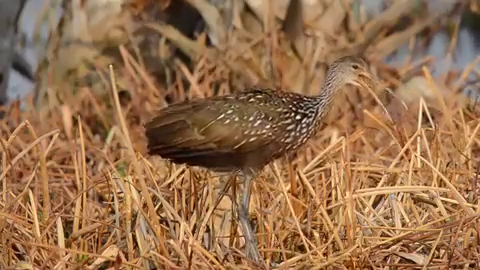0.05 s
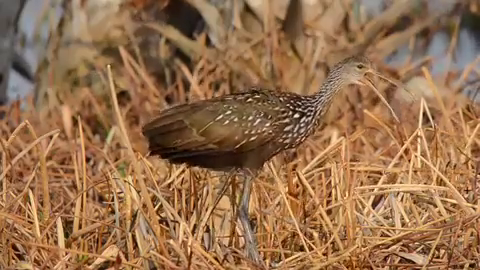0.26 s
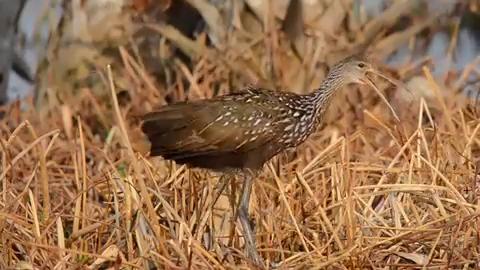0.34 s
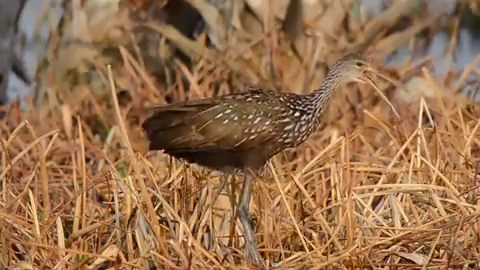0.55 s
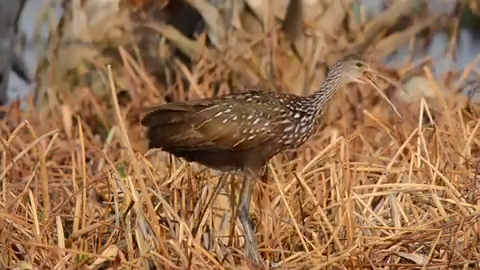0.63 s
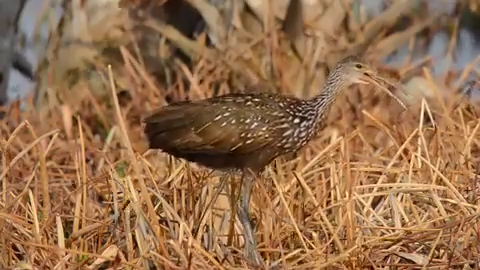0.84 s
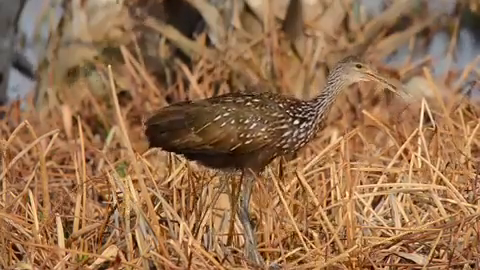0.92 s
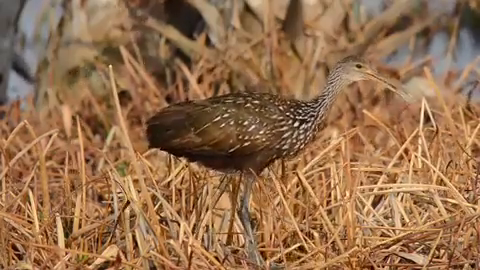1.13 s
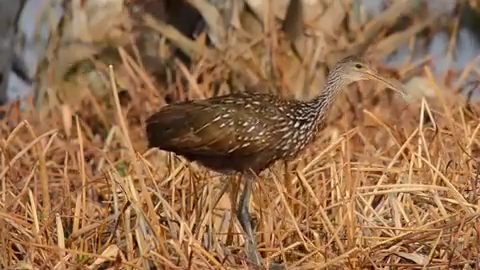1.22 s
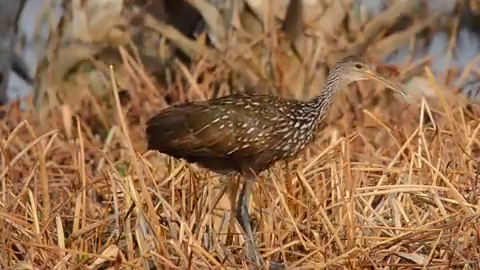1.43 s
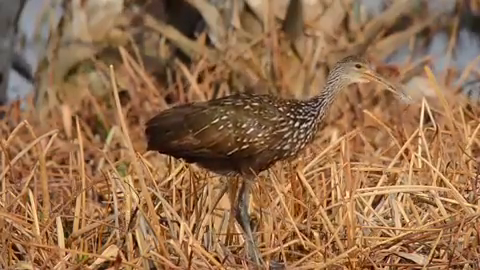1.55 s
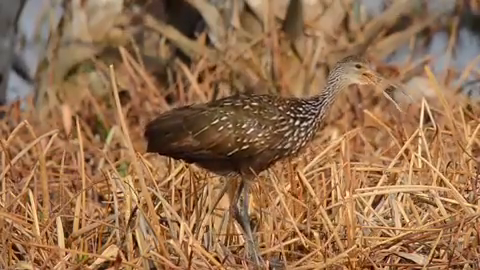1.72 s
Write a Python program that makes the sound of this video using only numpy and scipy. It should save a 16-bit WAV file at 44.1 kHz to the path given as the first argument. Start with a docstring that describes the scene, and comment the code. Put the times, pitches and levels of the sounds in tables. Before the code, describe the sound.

Quiet marsh air with a thin, very high, rapidly pulsing insect trill throughout and a tiny dry tick at the start. At about 0.2 s a limpkin clucks, then wails loudly, rising and cracking near 0.35 and 0.43 s. From about 0.46 s the clear, piercing cry slides down and weakens, breaking into a low clucking rattle around 0.93-1.06 s. Short reed echo, then only insect and faint wind.

```python
"""Limpkin wailing in dry reeds

A limpkin gives a few clucks, a rising cry that cracks twice, a long fall and a dying rattle.
The wail is a stack of harmonics shaped by the throat; a faint, low second voice sounds under it.
Clucks are short ringing pulses. An insect near 8 kHz chirps with each wing stroke, all through.
Shaped noise makes quiet marsh air and soft wind; one dry stem ticks; the reeds give a short echo.
"""
import sys
import numpy as np
from scipy import signal
from scipy.fft import rfft, irfft
from scipy.io import wavfile

SR = 44100
rng = np.random.default_rng(int(sys.argv[2]) if len(sys.argv) > 2 else 0)


def generate_wav(sig):
    """Save sig (samples, or channels by samples) to the path in sys.argv[1] as 16-bit PCM at SR."""
    pcm = np.round(np.clip(np.atleast_2d(sig).T, -1, 1) * 32767).astype(np.int16)
    wavfile.write(sys.argv[1], SR, pcm)


N = 79380
T = np.arange(N) / SR  # time of each sample [s]


def undb(db):
    """Turn decibels into gain."""
    return 10 ** (np.asarray(db) / 20)


def unit(x):
    """Scale to an rms (average strength) of 1."""
    return x / np.sqrt(np.mean(x ** 2))


def colour(hz, points):
    """Read the gain at the given frequencies from a (frequency, level) curve."""
    corner_hz, db = np.array(points, float).T
    return undb(np.interp(np.log(np.maximum(hz, 1)), np.log(corner_hz), db))


def noise(points):
    """Random hiss shaped by a (frequency, level) curve, rms 1."""
    hz = np.arange(N // 2 + 1) * SR / N
    spectrum = rfft(rng.standard_normal(N))
    return unit(irfft(spectrum * colour(hz, points), N))


def wobble(hz):
    """Random motion up to about the given rate, rms 1."""
    f = np.arange(N // 2 + 1) * SR / N
    spectrum = rfft(rng.standard_normal(N))
    return unit(irfft(spectrum / (1 + (f / hz) ** 4), N))


def curves(rows):
    """Join each column of a table by straight lines in time."""
    times, *columns = np.array(rows, float).T
    return [np.interp(T, times, column) for column in columns]


def gate(rows, attack, release):
    """Stay open from the first to the last row, with short ramps [s] outside them."""
    opening = np.clip((T - rows[0][0]) / attack + 1, 0, 1)
    closing = np.clip((rows[-1][0] - T) / release + 1, 0, 1)
    return opening * closing


# colour of the marsh air: (frequency [Hz], relative level [dB per Hz])
AIR_COLOUR = [(20,-33),(45,-12),(100,-9.5),(320,-7.5),(860,-9),(1200,-8.5),(2600,-17.5),(4500,-26.5),(5700,-33.5),(6500,-34),(8450,-61)]
# thin hiss of farther insects: (frequency [Hz], relative level [dB per Hz])
HISS_COLOUR = [(5500, -45), (7300, 7.5), (9000, -0.5), (11000, -11.5), (13000, -15.5), (15500, -32)]
# soft bumps of wind: (time of the middle [s], spread [s], level [dB])
WIND_BUMPS = [(1.141, 0.009, -59), (1.23, 0.067, -62), (1.689, 0.017, -51.5)]
AIR_DB, HISS_DB = -53.5, -65
BUMP_HZ = 60  # strongest frequency of the bumps


def marsh():
    """Quiet air and far hiss are steady noise; wind bumps are low noise that swells and fades."""
    air = noise(AIR_COLOUR) * undb(AIR_DB + 0.21 * wobble(20))
    hiss = undb(HISS_DB) * noise(HISS_COLOUR)
    swell = sum(undb(db) * np.exp(-.5 * ((T - at) / spread) ** 2) for at, spread, db in WIND_BUMPS)
    bumps = swell * noise([(15, -20), (BUMP_HZ, 0), (130, -5), (300, -35), (2000, -80)])
    return air + hiss + bumps


TICK_S, TICK_HZ, TICK_DECAY_S, TICK_DB = 0.022, 5100, .002, -49.5


def tick():
    """A dry stem ticks once: a high tone that dies within a few thousandths of a second."""
    age = np.maximum(T - TICK_S, 0)
    return undb(TICK_DB) * np.sin(2 * np.pi * TICK_HZ * age) * np.exp(-age / TICK_DECAY_S)


# colour of the echo: (frequency [Hz], relative level [dB])
ECHO_COLOUR = [(300, -50), (1500, 3.5), (3500, -4), (5500, -4.5), (12000, -4)]
ECHO_DELAY_S, ECHO_DECAY_S, TAIL_DECAY_S = .008, 0.04, 0.14
ECHO_DB, TAIL_DB = -17, -31.5  # for the bird


def scatter(x, decay):
    """Stems and ground send back dense reflections: decaying noise serves as the echo pattern."""
    age = T - ECHO_DELAY_S
    response = noise(ECHO_COLOUR) * (age > 0) * np.exp(-np.abs(age) / decay)
    response = response / np.sqrt(np.sum(response ** 2))
    return signal.fftconvolve(x, response)[:N]


STROKE_HZ, FIRST_STROKE_S, CHIRP_S = 51.8, -0.0022, 0.012
CHIRP_TOP_HZ, CHIRP_TOP_SHARE = 8348, 0.47  # highest pitch, and how far along the chirp it comes
CHIRP_ARCH_HZ = 2940  # pitch drop = this times the squared distance from the top
INSECT_DB = -45.154  # before the shape of each chirp
INSECT_ECHO_DB = -10.5  # relative to the chirps


def insect():
    """Each wing stroke gives a chirp that arches up and drops away; the reeds fill the gaps."""
    # position within the chirp, 0 to 1; it waits at 1 (silent) until the next stroke
    stroke = (T - FIRST_STROKE_S) * STROKE_HZ % 1
    along = np.minimum(stroke / (STROKE_HZ * CHIRP_S), 1)
    hz = CHIRP_TOP_HZ - CHIRP_ARCH_HZ * (along - CHIRP_TOP_SHARE) ** 2
    hz = hz + 45 * wobble(500) + 30 * wobble(51.6)
    size = np.maximum(np.sin(np.pi * along ** 0.54), 0) ** 0.39
    size = size * (1 + 0.17 * wobble(500))
    chirps = undb(INSECT_DB) * size * np.sin(2 * np.pi * np.cumsum(hz) / SR)
    echo = unit(scatter(chirps, ECHO_DECAY_S))
    return chirps + undb(INSECT_ECHO_DB) * np.std(chirps) * echo


# second voice, early and late stretch:
# (time [s], pitch [Hz], level before the harmonics' own levels [dB], pitch scatter [share of pitch])
UNDER_RISE = [(0.21, 568, -43.5, .08), (0.24, 460.4, -48, .01), (0.28, 433.6, -47.5, 0.05),
              (0.33, 497, -52, 0.07), (0.39, 651, -63, 0.01)]
UNDER_FALL = [(0.71, 600, -44, .08), (0.728, 556, -41.5, 0.16), (0.77, 436.3, -44, 0.045),
              (0.80, 423, -46, 0.02), (0.85, 495, -52, 0.0099), (0.90, 635, -49, 0.031)]
# its harmonics, from the lowest up: (level [dB])
UNDER_HARMONICS = [-7, -2, -2, -1]


def under_voice(rows):
    """A weak low tone with a few harmonics, its own pitch and a changing amount of pitch scatter."""
    hz, db, scatter_share = curves(rows)
    phase = 2 * np.pi * np.cumsum(hz * (1 + scatter_share * wobble(200))) / SR
    tone = sum(undb(level) * np.sin((k + 1) * phase) for k, level in enumerate(UNDER_HARMONICS))
    return tone * undb(db + 2.5 * wobble(90)) * gate(rows, .01, .015)


# clucks and rattle: (time [s], resonance [Hz], level before a fixed gain of 1.226 [dB])
CLUCKS = [(0.182, 1348, -28.5), (0.1877, 1393, -24), (.209, 1460, -20.5), (.2145, 1405, -17.5),
          (.934, 1288, -22.5), (0.9397, 1342, -19.5), (0.9454, 1310, -22.5), (0.9503, 1273, -25.5),
          (0.9894, 1276, -20.5), (.996, 1280, -25), (1.001, 1220, -29), (1.0452, 1183, -27),
          (1.053, 1133, -31.5), (1.0588, 1137, -39.5)]
# colour of the rasp in a cluck: (frequency [Hz], relative level [dB])
CLUCK_RASP = [(300, -34.5), (900, -17), (1250, -2), (1750, -11.5), (2300, -7), (3000, 1.5), (4400, -0.5),
              (5200, -12), (5700, -28), (6400, -11.5), (7200, -21), (10500, -25.5), (12000, -42.5),
              (15000, -61)]
CLUCK_ATTACK_S, CLUCK_DECAY_S = 0.00046, 0.0038
RASP_DECAY_S, RASP_DB = 0.0021, -7.5


def clucks():
    """Single slow pulses of the voice: each rings the throat and carries a short rasp."""
    out, hoarse_noise = np.zeros(N), noise(CLUCK_RASP)
    for start, hz, db in CLUCKS:
        age = np.maximum(T - start, 0)
        ring = np.sin(2 * np.pi * hz * age + 0.47 * wobble(150)) * np.exp(-age / CLUCK_DECAY_S)
        rasp = undb(RASP_DB) * hoarse_noise * np.exp(-age / RASP_DECAY_S)
        attack = 1 - np.exp(-age / CLUCK_ATTACK_S)
        out += 1.226 * undb(db) * attack * (ring + rasp)
    return out


# three stretches of the wail: (time [s], pitch [Hz], fundamental [dB],
# overtones before the throat colour [dB], extra on odd-numbered overtones [dB])
RISE = [(0.211, 1269, -29.5, -19.5, -10.5), (0.23, 1320, -19, -18, 2), (0.262, 1390, -13.5, -26.5, 16),
        (0.269, 1513, -19, -21.5, 6.5), (0.285, 1563, -17.5, -26.5, 12), (0.305, 1670, -28.5, -9, 2.5),
        (0.32, 1726, -40, -6, -8.5), (0.341, 1760, -47, -3.5, -3.5), (0.346, 1507, -14.5, -21.5, -5),
        (0.349, 1443, -16, -20, 9.5), (0.353, 1630, -41, -22.5, 5.5)]
CREST = [(0.394, 1826, -25.5, 1.5, -6), (0.398, 1897, -37, 1, -28), (0.408, 1854, -28, 3.5, -5.5),
         (0.419, 1837, -31.5, -10, 4.5), (0.424, 1711, -50, -6, -5), (0.428, 1685, -26, -6, -1.5),
         (0.431, 1482, -14.5, -22, 13), (0.434, 1500, -19, -25.5, 9.5), (0.438, 1880, -36, -6.5, 4)]
FALL = [(0.461, 1790, -22.5, -2.5, -13), (0.465, 1817, -39.5, -4.5, -1.5), (0.48, 1763, -40, -2.5, -4.5),
        (0.5, 1707, -35, -7, -9), (0.515, 1646, -28.5, -10, 4.5), (0.53, 1548, -20.5, -24.5, 17),
        (0.55, 1517, -18.5, -25, 14.5), (0.6, 1455, -19, -17, 4), (0.628, 1403, -14, -24, 15),
        (0.637, 1326, -15.5, -12.5, -10), (0.68, 1290, -18.5, -18, 1), (0.76, 1235, -27, -16.5, -2),
        (0.85, 1182, -31, -21, -5), (0.9, 1130, -35.5, -18.5, -11.5), (0.922, 1104, -35, -18, -14),
        (0.931, 1016, -36, -18.5, -17)]
# throat and bill colour of the overtones: (frequency [Hz], level [dB])
THROAT = [(2100,-27),(2600,-14.5),(3000,5.5),(3600,-16.5),(4050,-21.5),(4500,-16),(5350,-21.5),(5700,-40.5),(6050,-25.5),(6550,-33.5),(6950,-42.5),(7500,-41.5),(8300,-28),(9500,-45),(11000,-57),(13000,-59),(15500,-94)]
# hoarseness of the wail: (time [s], roughness [0-1])
ROUGHNESS = [(.21, 0.6), (.222, 0.54), (.235, 0.17), (.338, 0), (.347, 0.34), (.355, 0.5), (.395, .08),
             (.42, 0.13), (.431, 0.32), (.44, 0.45), (.462, 0.21), (.49, 0), (.70, 0.02), (.725, 0.03),
             (.78, 0.02), (.88, 0), (.93, 0.18)]
# colour of the rasp in the hoarse wail: (frequency [Hz], relative level [dB])
WAIL_RASP = [(300, -23), (1000, -9.5), (1500, 4.5), (2200, -25.5), (3000, 7.5), (5200, -4.5), (5700, -10.5),
             (6300, -5), (9500, -11), (12000, -31), (15000, -39.5)]
ATTACK_S, RELEASE_S = .002, .0035
# shaking when fully hoarse: rate, loudness swing [share], phase swing [radians]
ROUGH_HZ, ROUGH_SWING, ROUGH_PHASE = 410, 0.38, 0.23
JITTER = 0.0016  # constant pitch unsteadiness [share of pitch]
FLUTTER_DB, FLUTTER_HZ = 0.63, 30.2  # FLUTTER_DB times (harmonic number - 1.5)
RASP_SHARE_DB = -4.5  # rasp under a fully hoarse wail, relative to the overtones


def wail(rows, count=11):
    """A harmonic tone through the throat; where it is hoarse it shakes and rasps."""
    hz, first_db, upper_db, odd_db = curves(rows)
    rough, = curves(ROUGHNESS)
    phase = 2 * np.pi * np.cumsum(hz * (1 + JITTER * wobble(300))) / SR
    phase = phase + ROUGH_PHASE * rough * wobble(ROUGH_HZ)
    sizes = [undb(first_db)]
    for k in range(2, count + 1):
        # each overtone wavers on its own, the higher ones more
        flutter_db = FLUTTER_DB * (k - 1.5) * wobble(FLUTTER_HZ)
        sizes.append(undb(upper_db + odd_db * (k % 2) + flutter_db) * colour(k * hz, THROAT))
    tone = sum(size * np.sin((k + 1) * phase) for k, size in enumerate(sizes))
    overtone_size = np.linalg.norm(sizes[1:], axis=0)
    rasp = undb(RASP_SHARE_DB) * rough * overtone_size * noise(WAIL_RASP)
    shake = 1 + ROUGH_SWING * rough * wobble(ROUGH_HZ)
    return (tone * shake + rasp) * gate(rows, ATTACK_S, RELEASE_S)


def scene():
    """Add the marsh, the tick and the insect to the bird and its echo."""
    bird = under_voice(UNDER_RISE) + under_voice(UNDER_FALL) + clucks()
    bird = bird + wail(RISE) + wail(CREST) + wail(FALL)
    echo = undb(ECHO_DB) * scatter(bird, ECHO_DECAY_S)
    tail = undb(TAIL_DB) * scatter(bird, TAIL_DECAY_S)
    return (marsh() + tick() + insect() + bird + echo + tail)[None]


TOP_HZ = 15700


def record(dry):
    """A steep low-pass filter removes the sound above TOP_HZ."""
    low_pass = signal.ellip(8, .2, 70, TOP_HZ, fs=SR, output="sos")
    return signal.sosfilt(low_pass, dry)


dry = scene()
out = record(dry)
generate_wav(out)
```